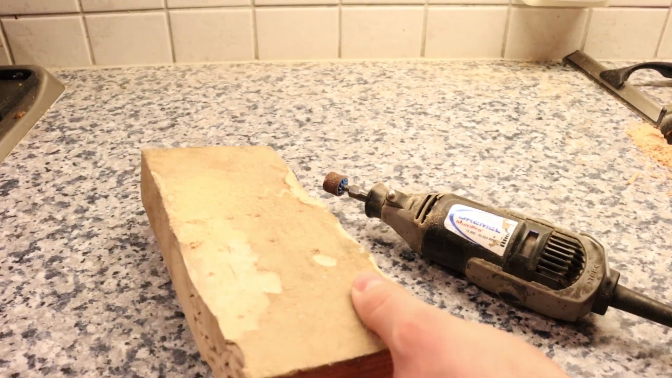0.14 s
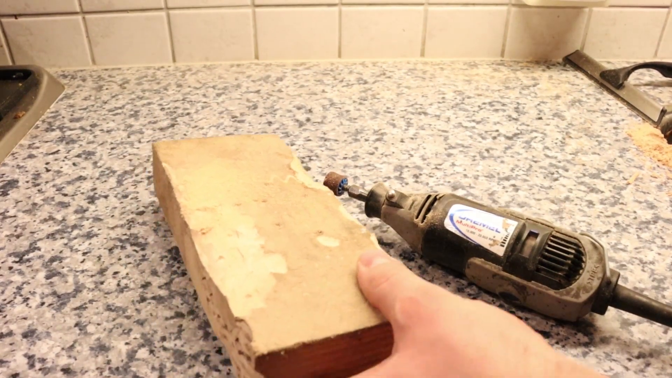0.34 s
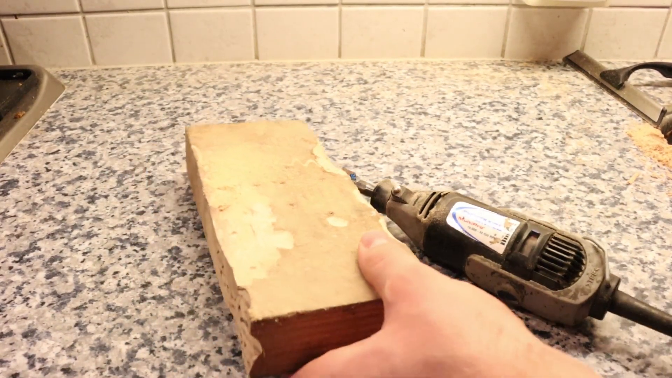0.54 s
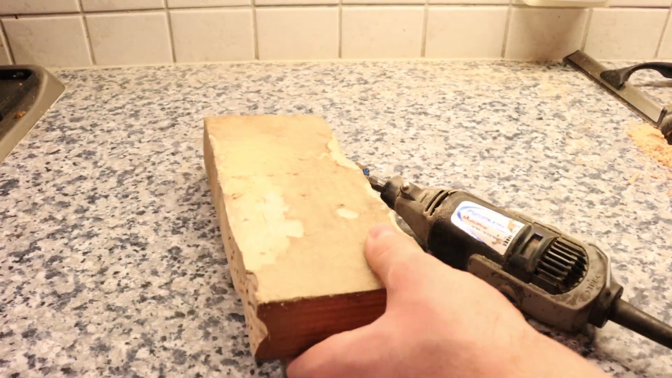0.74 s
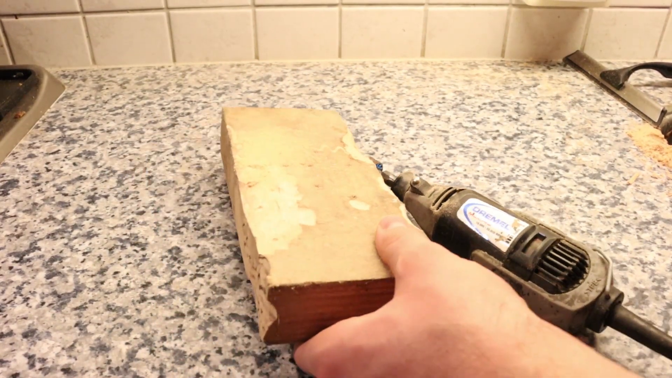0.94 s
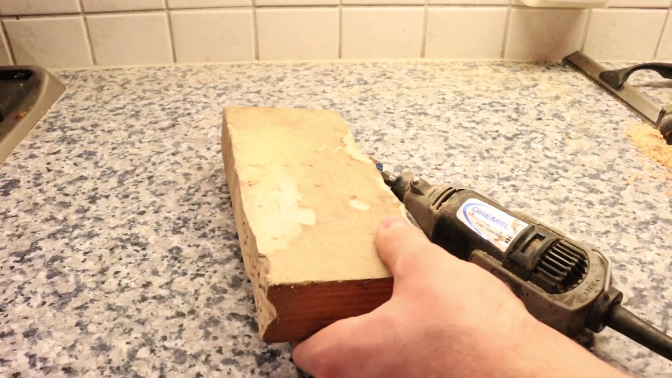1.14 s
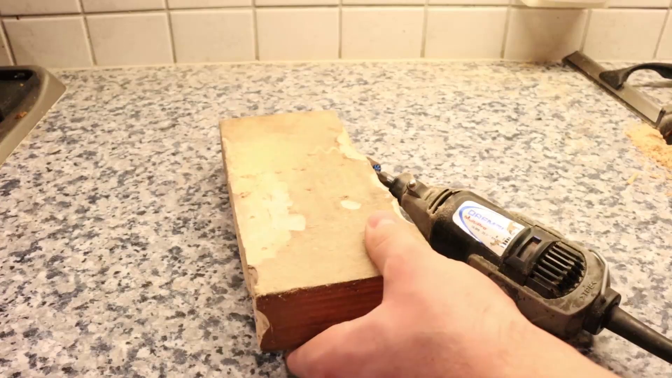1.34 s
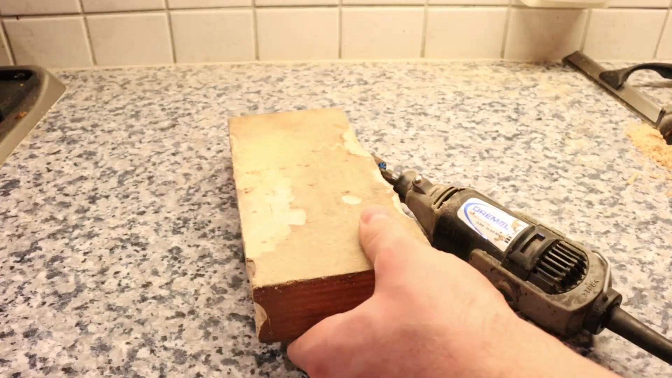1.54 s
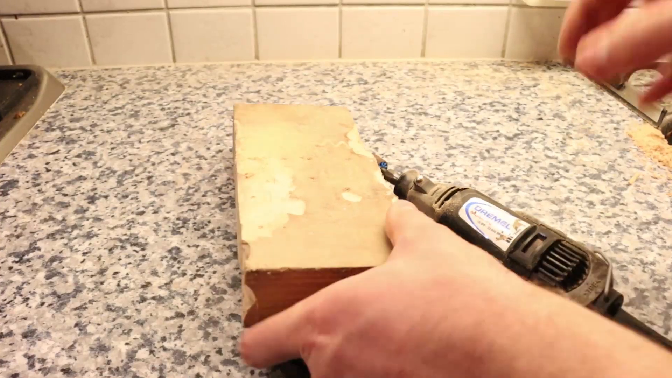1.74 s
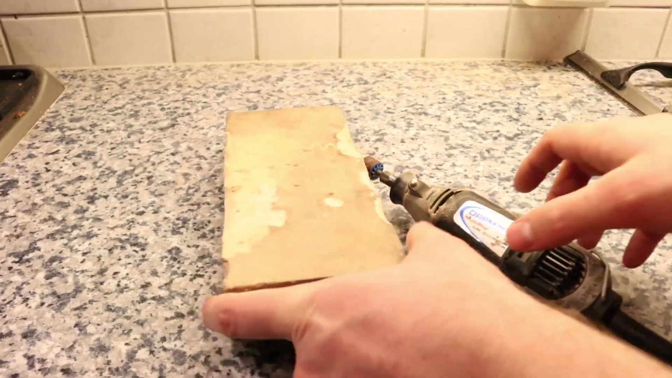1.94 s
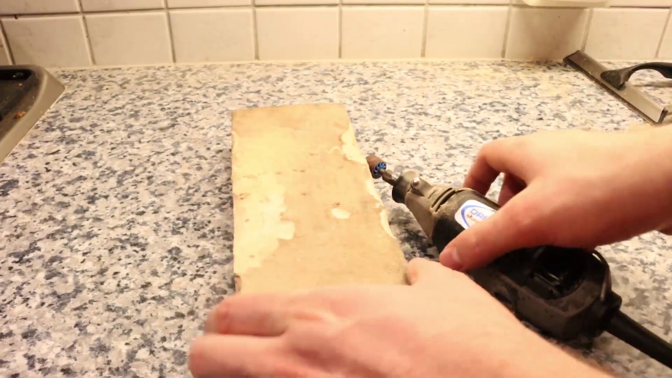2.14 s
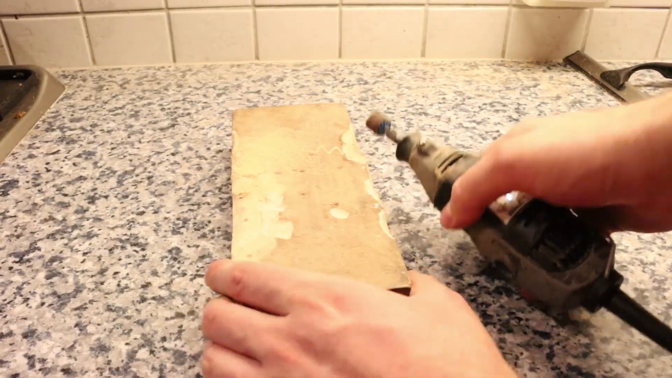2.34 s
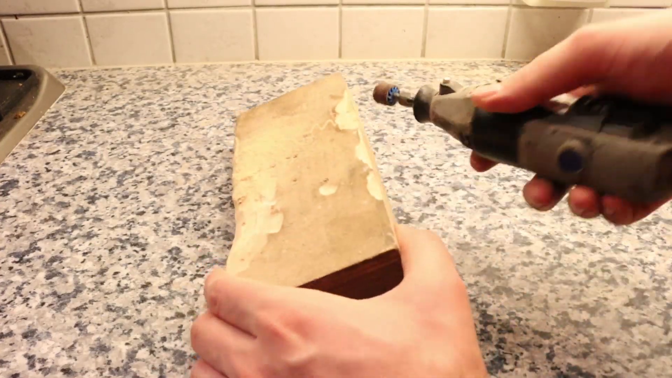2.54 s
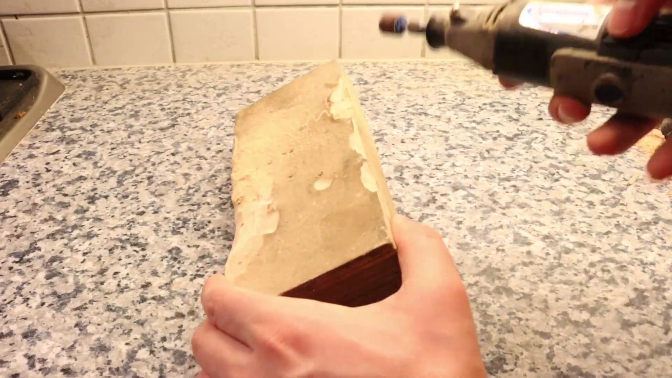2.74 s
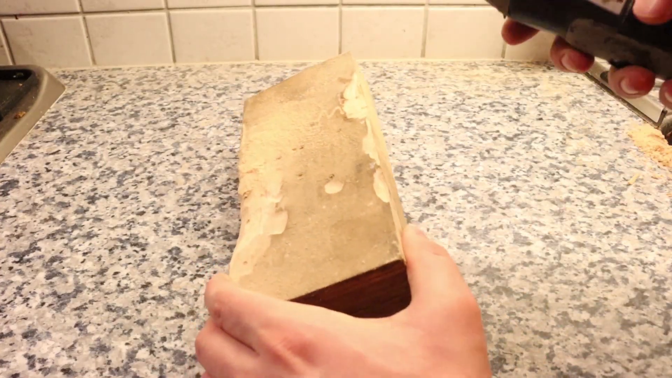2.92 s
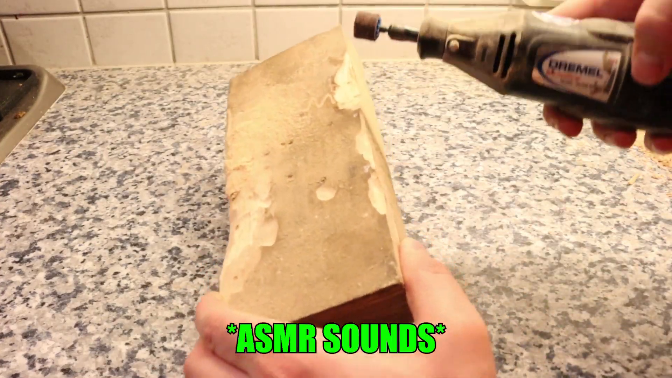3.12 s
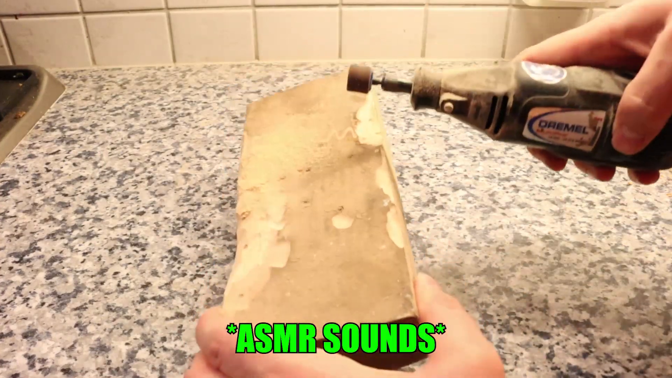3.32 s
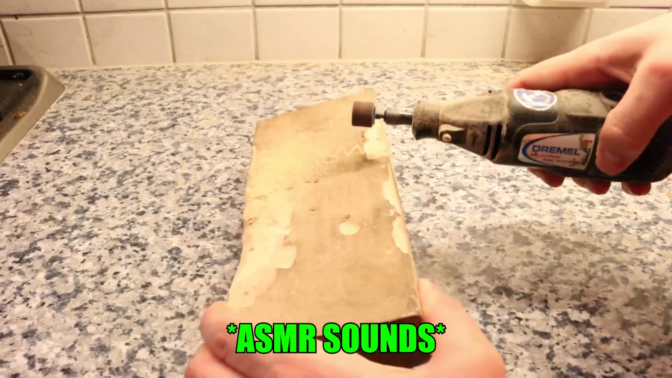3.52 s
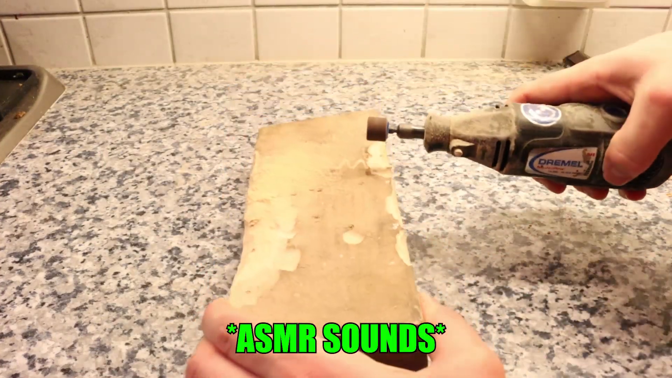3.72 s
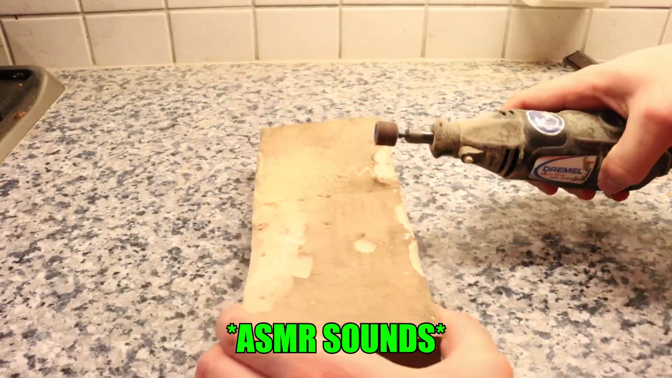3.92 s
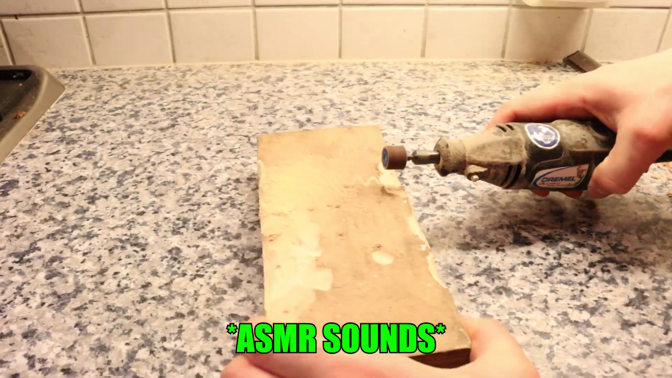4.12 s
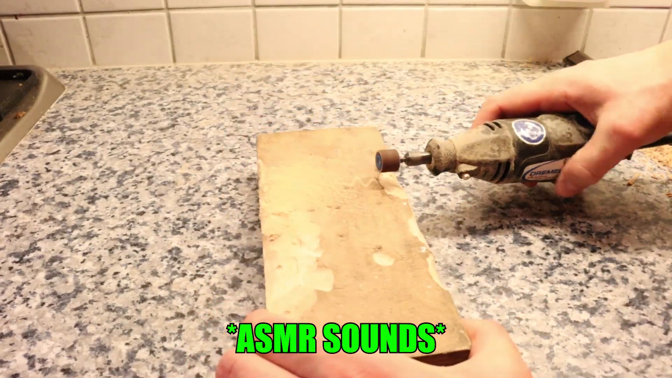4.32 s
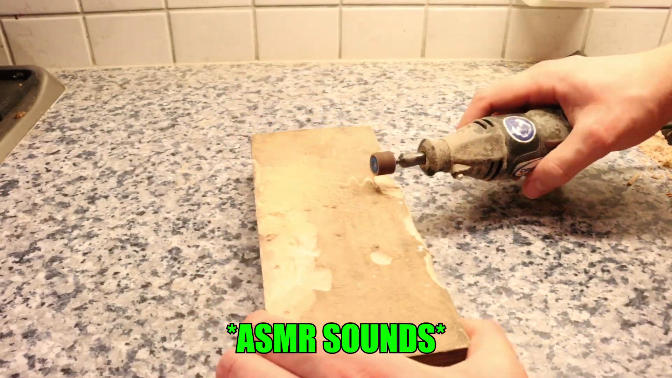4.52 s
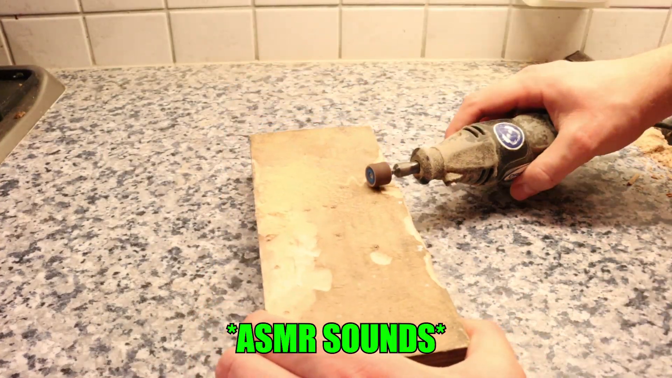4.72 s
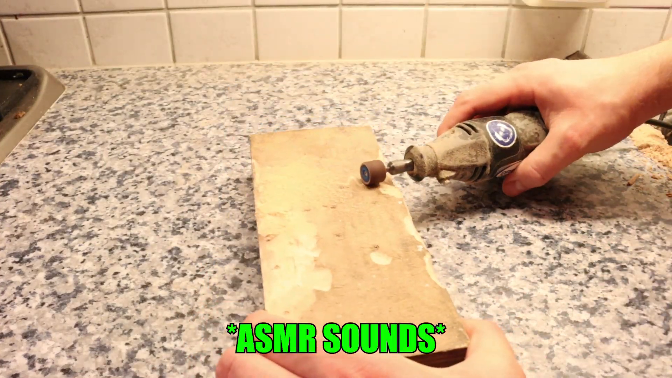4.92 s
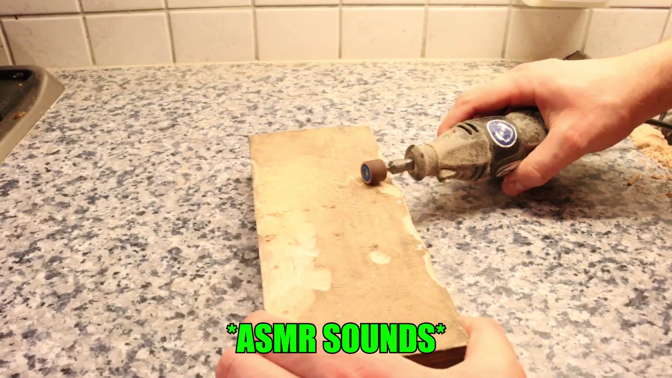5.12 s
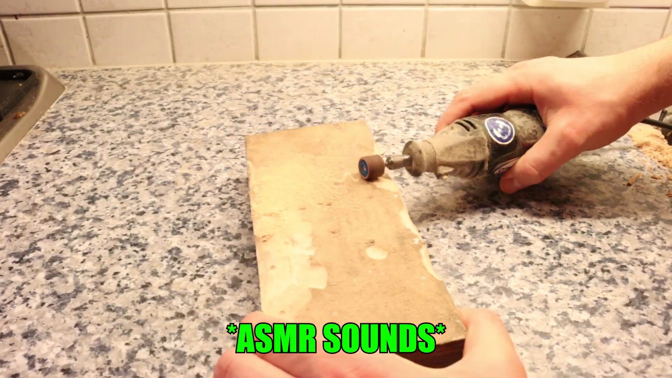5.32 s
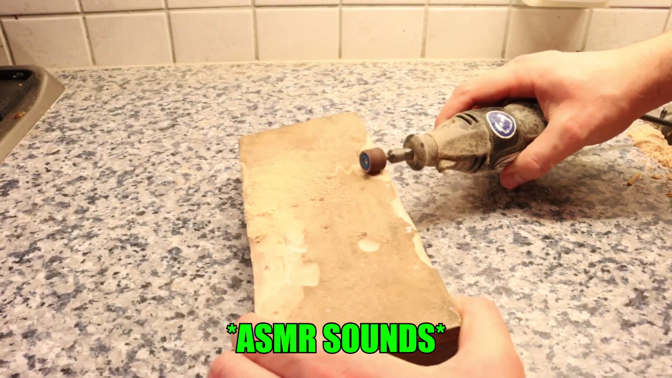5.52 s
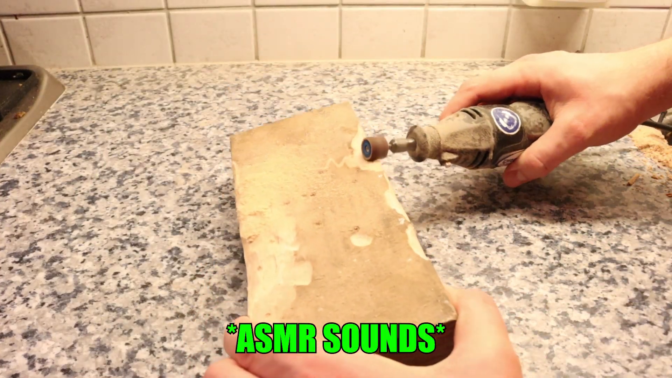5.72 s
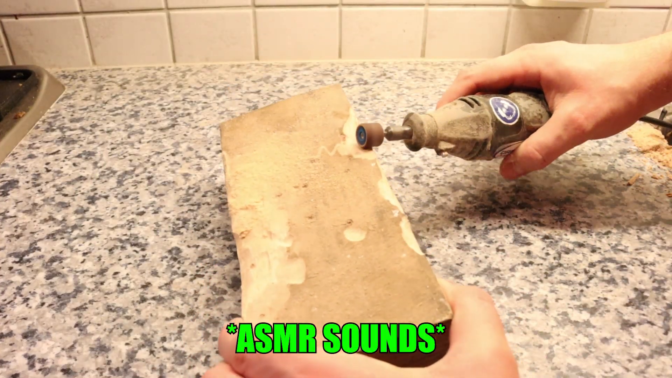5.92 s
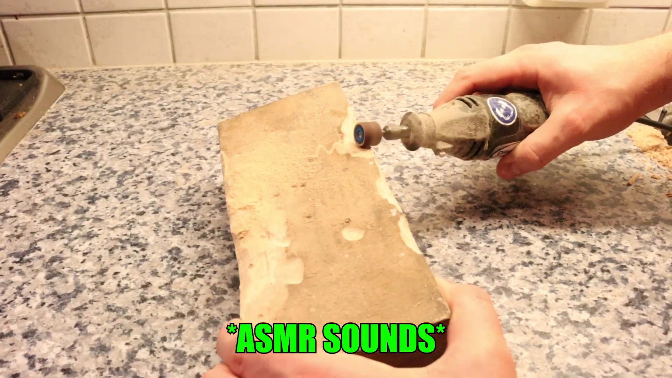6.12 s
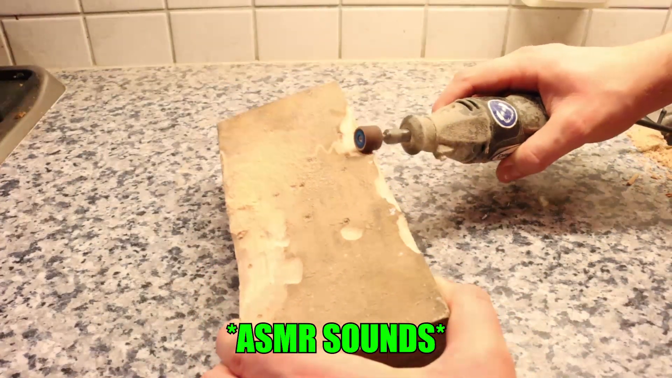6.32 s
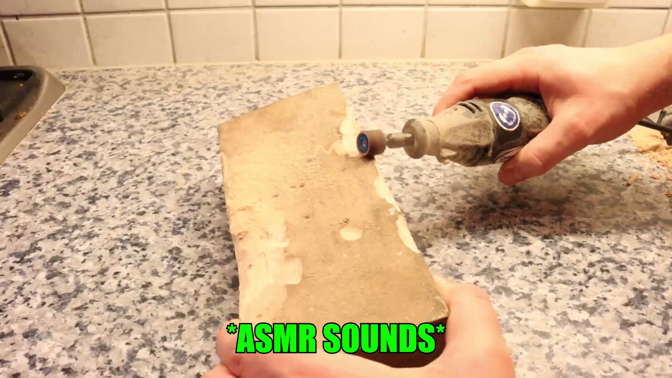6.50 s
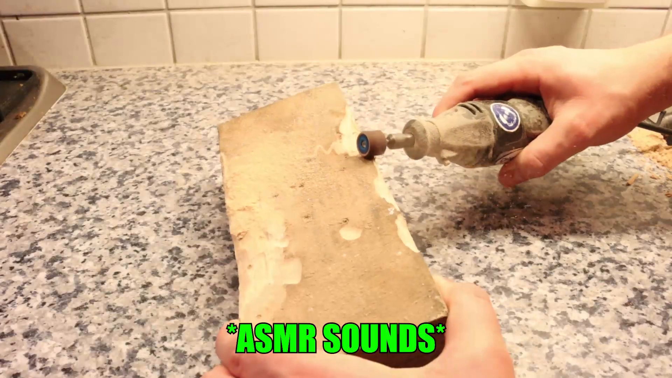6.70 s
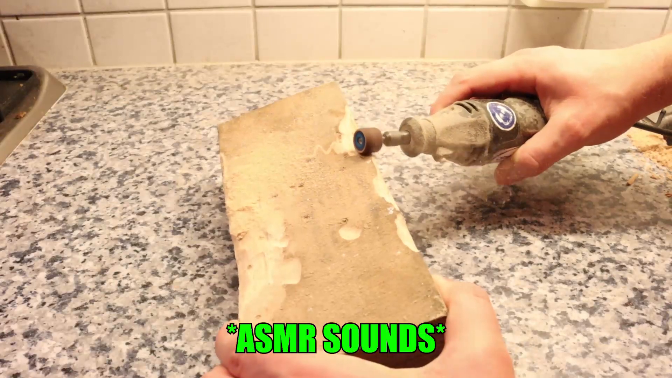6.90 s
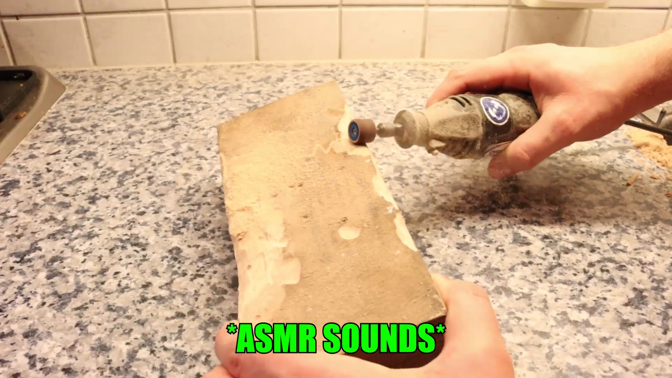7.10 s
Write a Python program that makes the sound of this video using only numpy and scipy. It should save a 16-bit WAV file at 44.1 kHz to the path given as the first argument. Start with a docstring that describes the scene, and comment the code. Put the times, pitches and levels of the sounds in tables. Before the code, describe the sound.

After wood slides and clatters on a countertop, a small handheld motor buzzes, winds up, and grinds the wood in two shrill passes.

```python
"""First a wooden block judders and scrapes over a stone kitchen counter, with knocks, scuffs and the zip
of a cord as a rotary tool is picked up. The tool switches on: bursts of chopped mains current buzz in
its housing while brushes hiss and the fan winds up. Its sanding drum then bites the block twice,
rasping, making the wood sing on multiples of the shaft speed (orders) and slowing under the load."""
import sys
import numpy as np
from scipy import signal
from scipy.fft import rfft, irfft, next_fast_len
from scipy.io import wavfile
from scipy.ndimage import uniform_filter1d

SR = 44100
rng = np.random.default_rng(int(sys.argv[2]) if len(sys.argv) > 2 else 0)


def unload_audio(sound):
    """Save the sound as a 16-bit wav file, at the path given as the first command line argument."""
    columns = np.transpose(np.atleast_2d(sound))
    # keep every value between -1 and 1, then stretch to whole-number steps
    steps = np.round(np.clip(columns, -1, 1) * 32767)
    wavfile.write(sys.argv[1], SR, steps.astype(np.int16))


N = 315756

# Tone colours. Each row: frequency in Hz, relative level in dB.
ROOM_SPECTRUM = [(20, -11), (38, -24), (48, 10.5), (60, -32), (100, 7.5), (200, -5), (500, -1.5),
                 (1500, -26.5), (15000, -56)]
JUDDER_SPECTRUM = [(41, -56), (70, -27), (149, -1.5), (306, -1), (387, -12.5), (449, 5), (527, -39),
                   (606, -9.5), (735, -38), (900, -15.5), (1170, -53), (1980, -120)]  # wood sticking and slipping on stone
SCRAPE_SPECTRUM = [(410, -40), (700, -4.5), (857, -5), (1220, -7), (1350, -5.5), (1570, -6.5), (1730, -6.5),
                   (2180, -6), (2360, -8.5), (3150, -7.5), (3740, -12), (4720, -11), (5090, -19.5),
                   (6000, -22), (7000, -35), (9100, -38), (15400, -120)]
RUB_SPECTRUM = [(2940, -38), (5000, -7.5), (5970, -5), (6840, -7.5), (10300, -10.5), (11600, -8),
                (15800, -14)]  # hiss on top of a slide
BLOW_SPECTRUM = [(35, -27), (60, -19), (302, 9), (750, -13), (1200, -12.5), (1710, -8.5), (1880, -11),
                 (2420, -17), (2650, -38), (3190, -19), (4840, -44), (15000, -40)]  # the push of a knock
RASP_SPECTRUM = [(600, -53), (2000, -12), (3500, 5), (5000, -2), (7000, -3.5), (9000, -6), (12000, -3.5),
                 (15000, -6), (15800, -16)]  # bright side of abraded wood
GRIND_SPECTRUM = [(150, -40), (250, -32), (500, -39), (800, 1.5), (1400, 2.5), (2300, 1.5), (3200, 8.5),
                  (5000, -39), (8000, -25)]  # its coarse midrange
FAN_SPECTRUM = [(100, -33.5), (250, -9.5), (500, -10), (800, -7), (1300, -5), (2300, 3.5), (4500, -4),
                (7000, -4.5), (10000, -9)]
BRUSH_SPECTRUM = [(2060, -13), (3500, 2), (3750, 1.5), (4310, -1), (4680, 0), (5310, -8), (7410, -38),
                  (7850, -6), (8620, -18), (9360, -1), (10200, -10), (13800, -3.5), (15800, -12.5)]
FLUTTER_SPECTRUM = [(90, -24), (150, -11), (200, -51), (255, -2.5), (330, 2.5), (450, -23.5)]  # low flutter of fan air brushing the microphone
WASH_SPECTRUM = [(500, -32), (950, -3), (1400, 0), (2400, 0.5), (4000, -11.5)]  # midrange rush of air
GRIT_SPECTRUM = [(380, -53), (650, -19), (1370, -9.5), (1770, -46), (2100, -12), (2710, -15), (3270, -9.5),
                 (3690, -24), (4100, -7.5), (4630, -24), (5800, -16.5), (7280, -14.5), (9020, -19.5),
                 (15800, -12.5)]  # shapes the drum's comb of tones
FIZZ_SPECTRUM = [(7000, -25), (11000, -5), (13500, -2), (15500, -1), (15900, -6)]  # drum on the block's corner

# The shaft winds up, then sags under each pass. Each row: time in seconds, turns per second.
SHAFT_SPEED = [(3.42, 20.2), (3.5, 75), (3.62, 121), (3.72, 153), (3.85, 188), (4.0, 223), (4.2, 270),
               (4.4, 309), (4.6, 348), (4.8, 381), (5.0, 382), (5.12, 380), (5.33, 378), (5.45, 372),
               (5.58, 360), (5.79, 379.5), (5.9, 383), (6.1, 375.4), (6.27, 365), (6.43, 367), (6.6, 352),
               (6.8, 344), (7.16, 326)]
# Level rides. Each row: time in seconds, relative level in dB.
ROOM_RIDE = [(0, -63), (2.3, -62.5), (3.4, -75), (4.3, -82.5), (7.16, -101)]
CURRENT_RIDE = [(3.42, -15.5), (3.52, -6.5), (3.66, -3), (3.76, -4), (3.92, -2.5), (4.12, 2), (4.3, -4),
                (4.45, -5.5), (7.16, -22)]  # high while the motor accelerates
WHINE_RIDE = [(3.4, -77), (4.1, -72), (4.6, -51), (5.9, -53), (6.4, -66), (7.16, -61)]
IMBALANCE_RIDE = [(4.25, -64), (4.45, -60.5), (4.6, -57.5), (4.85, -53), (5.36, -52), (5.51, -45),
                  (5.68, -62), (6.55, -52), (6.82, -64.5), (7.0, -60.5), (7.16, -58.5)]
PRESSURE_RIDE = [(4.85, -6.5), (5.1, 0), (5.3, -2), (5.5, -1), (5.78, 0), (5.9, 0), (6.33, -2), (6.55, 2.5),
                 (6.85, -4.5), (7.16, -2.5)]  # the hand's push on the drum
FIZZ_RIDE = [(5.6, -13), (5.79, 3), (6.0, -1), (6.25, 8), (6.6, -4), (6.85, 3), (7.16, 0)]  # rises over the rasp as the drum meets the corner

# Resonances. Each row: centre in Hz, width in Hz, relative level in dB.
HOLLOW_MODES = [(176, 76, -7.5), (231, 38, 5.5), (308, 37, 0), (433, 40, -11.5)]  # block resting on the counter
SCRAPED_MODES = [(1393, 40, -8), (1724, 50, 1.5), (1850, 64, -4.5), (2360, 460, -15), (2850, 87, -5),
                 (3190, 69, -5), (4200, 200, -9)]  # scraped wood
THUMP_MODES = [(146.4, 6.8, 6), (326, 71, -1.5), (588, 63, -1.5), (836, 120, -9.5), (1310, 260, -14.5)]  # low body of a knock
HOUSING_MODES = [(2472, 194, -3.5), (3060, 1100, -20.5), (4500, 340, -27), (6030, 1800, -31)]
DUCT_MODES = [(809.4, 35, 6), (1084, 140, -1), (1330, 42, 2.5), (1730, 220, -7)]  # the housing's air channels
SINGING_MODES = [(1740, 42, -34), (1890, 76, -47), (2048, 54, -42), (2190, 96, -54.5), (2710, 280, -52),
                 (2850, 78, -52), (3100, 130, -50), (3120, 78, -41), (3810, 230, -54.5)]  # block under the drum

# Motor tones. Each row: shaft order, relative level in dB.
COMMUTATOR_ORDERS = [(8, 6.5), (16, -0.5), (24, -6.5), (32, -6.5)]  # segments passing the brushes
CHIRP_ORDERS = [(16, -9.5), (18, -14), (24, -8), (32, -7.5), (36, -14)]  # brushes chirping on the segments
WHINE_ORDERS = [(18, -6.5), (24, -22), (36, -32)]  # fan blades and vents
# Stator hum. Each row: multiple of the burst rate, relative level in dB.
STATOR_HARMONICS = [(2, -72), (4, -64.5)]

# Pushes over the counter. Each row: start and end in seconds, judder, scrape and hiss levels in dB,
# wood resonance in dB over the scrape.
SLIDES = [(0.007, 0.19, -52.5, -54.5, -65.5, 1.5), (0.21, 0.385, -44, -53, -55.5, -0.5),
          (0.445, 0.686, -42.5, -47, -52, 4.5), (0.838, 0.944, -45, -54, -57, -5),
          (1.595, 1.76, -55, -55.5, -58, -7), (1.831, 1.898, -48, -40, -52, 9),
          (2.11, 2.138, -54, -45.5, -58.5, -10), (2.323, 2.363, -49, -50, -59.5, -4),
          (2.546, 2.747, -55.5, -57.5, -58.5, -5), (2.855, 3.104, -72, -73, -60.5, -11)]
# Blows on the counter. Each row: start in seconds, then relative thud, knock and click levels in dB.
KNOCKS = [(0.181, -45.5, -62, -72), (0.236, -43, -53, -64), (0.468, -41, -67, -58), (0.535, -44, -60, -60),
          (0.573, -36, -45, -51), (0.648, -49, -70, -68), (0.886, -48.5, -59, -60), (1.461, -68, -58, -62),
          (1.97, -18, -19, -22.5), (2.019, -22.5, -22, -32.5), (2.043, -31, -31.5, -40),
          (2.092, -31.5, -49, -73), (2.145, -19, -59, -36.5), (2.153, -18.5, -22.5, -47),
          (2.479, -27, -44, -58), (2.54, -35.5, -59, -56.5), (2.579, -42, -68, -70),
          (2.931, -40.5, -44.5, -52), (2.95, -42.5, -48.5, -64), (3.143, -63.5, -67, -75),
          (3.167, -51.5, -58.5, -68), (3.322, -52.5, -50, -47.5), (3.331, -50.5, -54, -55),
          (3.349, -52.5, -56, -67), (3.395, -61.5, -69, -59), (3.754, -33.5, -47.5, -61),
          (3.776, -44, -63, -69), (4.291, -56.5, -84, -79)]
# The slab's ring. Each row: frequency in Hz, relative level in dB.
COUNTER_MODES = [(104, -36.5), (149, -29.5), (222, -33), (272, -32.5), (318, -26.5), (347, -26.5),
                 (409.1, -34.5), (500.6, -39.5), (581.4, -71), (619.1, -33), (690, -41), (861.3, -40.5),
                 (947.5, -42), (985.1, -42), (1050, -47), (1098, -49.5), (1147, -55), (1276, -47),
                 (1400, -46), (1750, -37), (1885, -45), (1981, -61), (2143, -61), (2638, -57), (2891, -76),
                 (3160, -73), (3295, -79)]
# Its decay after a hard blow. Each row: frequency in Hz, seconds to fall 60 dB.
COUNTER_DECAY = [(150, 0.39), (350, 0.24), (600, 0.24), (950, 0.36), (1800, 0.14), (3200, .11)]
# Catches of the wood. Each row: peak time in seconds, rise in seconds, relative level in dB.
SCUFFS = [(0.189, .004, -46), (0.704, 0.017, -40.5), (2.382, 0.0099, -51), (2.886, 0.008, -57),
          (3.235, 0.042, -57.5), (4.861, 0.009, -36.5), (5.774, 0.0018, -40.5)]
# Pulls on the cord. Each row: start and length in seconds, top pitch in Hz, relative level in dB.
CORD_PULLS = [(1.512, 0.42, 5030, -57), (2.048, 0.33, 5140, -60)]
# Its squeaks. Each row: start and length in seconds, pitch at the ends and at the top in Hz, level in dB.
CORD_SQUEAKS = [(1.53, .17, 10800, 12700, -73), (1.57, 0.25, 9700, 10300, -67),
                (1.6, 0.12, 13300, 13900, -72), (1.673, .17, 11300, 12100, -62),
                (2.08, .2, 13900, 14650, -67), (2.136, 0.17, 11100, 12550, -69)]
# Drum on wood. Each row: start and end in seconds, then relative rasp, grind and singing levels in dB.
PASSES = [(4.846, 5.507, -45.5, -54, 3.5), (5.821, 7.2, -49, -57, -2)]
# Grabs of the drum. Each row: peak time and length in seconds, shaft order, level in dB.
SQUEALS = [(4.868, 0.023, 7, -41.5), (4.866, .025, 8, -48), (4.869, 0.018, 11, -52), (4.945, .06, 8, -48),
           (5.078, 0.097, 8, -38), (5.095, 0.037, 5, -46), (5.118, .13, 13, -49), (5.123, 0.075, 10, -48),
           (5.16, 0.14, 6, -37.5), (5.172, .17, 11, -42.5), (5.175, 0.15, 7, -37.5), (5.197, 0.11, 16, -49),
           (5.352, 0.13, 5, -33.5), (5.41, 0.086, 6, -46), (5.425, 0.25, 8, -39.5), (5.43, 0.062, 7, -36.5),
           (5.395, .08, 11, -44), (5.478, 0.068, 11, -34), (5.483, 0.14, 9, -39.5),
           (5.494, 0.19, 10, -43.5), (5.504, 0.14, 12, -45.5), (5.524, 0.052, 13, -45),
           (5.534, 0.045, 5, -40.5), (5.541, 0.03, 9, -27), (5.826, 0.026, 8, -35.5),
           (5.876, 0.075, 8, -43), (5.894, 0.073, 7, -43), (6.003, .09, 8, -44), (6.013, 0.017, 8, -33),
           (6.015, 0.022, 7, -42.5), (6.084, 0.1, 5, -43), (6.148, 0.055, 7, -42.5),
           (6.153, 0.021, 11, -38), (6.17, 0.12, 8, -39), (6.246, .14, 5, -35.5), (6.28, 0.17, 11, -41),
           (6.389, 0.041, 5, -32.5), (6.442, 0.054, 8, -41.5), (6.467, 0.056, 11, -36.5),
           (6.47, 0.046, 9, -37), (6.523, 0.14, 13, -44.5), (6.526, 0.12, 5, -40), (6.574, 0.051, 9, -31.5),
           (6.666, 0.096, 5, -29), (6.699, 0.15, 9, -41), (6.8, .11, 5, -31), (6.796, 0.077, 8, -46),
           (6.926, 0.09, 8, -45), (6.93, 0.075, 12, -42.5), (6.987, 0.17, 6, -46), (7, .08, 5, -41),
           (7.042, 0.19, 9, -37.5)]

# Stereo width of noise. Each row: frequency in Hz, left-right correlation.
STEREO_LIKENESS = [(150, 0.97), (380, 0.75), (950, 0.57), (2380, 0.19), (5980, 0.032), (15000, 0.055)]
# Placement. Each row: frequency in Hz, left minus right in dB.
HAND_PAN = [(60, -1.5), (150, -0.5), (380, -1.5), (600, 2.5), (950, 1), (2380, -2), (5980, -1.5),
            (15000, -3.0)]
TOOL_PAN = [(120, -5), (240, 0), (480, 5), (950, 5.5), (1890, -4.5), (3770, -1.5), (7520, -0.5),
            (15000, -4.5)]
# Reverb of the tiled walls. Each row: frequency in Hz, seconds to fall 60 dB.
KITCHEN_DECAY = [(120, 0.079), (400, 0.39), (1000, 0.11), (2500, 0.18), (10000, 0.027)]

SWITCH_ON_S, BUZZ_END_S = 3.41, 4.31  # the buzz dies away as the set speed nears
FULL_SPEED_HZ, BURST_HZ = 380, 100  # shaft turns; half waves of the mains
TIME = np.arange(N) / SR


def amp(db):
    """Decibels to gain."""
    return 10 ** (np.asarray(db) / 20)


def unit(x):
    """Scale to rms 1."""
    return x / np.sqrt(np.mean(x ** 2) + 1e-20)


def along(points, hz):
    """Read (Hz, value) points on a log frequency axis."""
    freqs, values = np.transpose(points)
    return np.interp(np.log(hz + 1), np.log(freqs + 1), values)


def ride(points):
    """Turn (seconds, value) points into one value per sample."""
    return np.interp(TIME, *np.transpose(points))


def during(start, end=99, attack=0.19, release=0.092):
    """A gate that fades in before start and out after end, all in seconds."""
    return np.clip(np.minimum(1 + (TIME - start) / attack, 1 - (TIME - end) / release), 0, 1)


def wobble(rate):
    """A smooth random curve, rate knots a second."""
    knots = rng.standard_normal(int(N * rate / SR) + 4)
    smooth = signal.resample(knots, len(knots) * 8)
    return np.interp(TIME * rate * 8, np.arange(len(smooth)), smooth)


def filtered(x, response):
    """Filter x by a complex response, given as a function of Hz."""
    n = x.shape[-1]
    padded = next_fast_len(n + 8192)
    return irfft(rfft(x, padded) * response(np.fft.rfftfreq(padded, 1 / SR)), padded)[..., :n]


def resonate(x, modes):
    """Play x through parallel resonances of alternating polarity."""
    return filtered(x, lambda f: sum(
        (-1) ** k * amp(db) * 1j * f * width / (centre ** 2 - f ** 2 + 1j * f * width)
        for k, (centre, width, db) in enumerate(modes)))


def pan(left_db):
    """Left and right gains for a level difference."""
    return amp(np.array([[.5], [-.5]]) * left_db)


def noise(spectrum):
    """Coloured stereo noise of rms 1, near mono in the bass and wide in the treble."""
    def colour(hz):
        spread = np.arccos(along(STEREO_LIKENESS, hz)) / 2
        return amp(along(spectrum, hz)) * [np.cos(spread), np.sin(spread)]
    mid, side = filtered(rng.standard_normal((2, N)), colour)
    return unit(np.array([mid + side, mid - side]))


def wavering(angle, orders, flicker_db, flicker_rate, jitter_rad, jitter_rate):
    """Sines on multiples of a turning angle, each unsteady in level and phase."""
    return sum(amp(db + flicker_db * wobble(flicker_rate))
               * np.sin(order * angle + jitter_rad * wobble(jitter_rate)) for order, db in orders)


def kitchen(x, wet_db):
    """Mono x with a fresh stereo tail from the tiled walls."""
    hz, t, spectra = signal.stft(rng.standard_normal((2, SR // 2)), SR, nperseg=256)
    tail = signal.istft(spectra * amp(-60 * t / along(KITCHEN_DECAY, hz)[:, None]), SR, nperseg=256)[1]
    tail /= np.linalg.norm(tail[0])
    return x + amp(wet_db) * signal.fftconvolve(x[None], tail, axes=1)[:, :len(x)]


def add(track, start_s, sound):
    """Mix a stereo sound into the track."""
    part = track[:, round(start_s * SR):][:, :sound.shape[-1]]
    part += sound[..., :part.shape[-1]]


def room_tone():
    """A low mono rumble that fades away under the scene."""
    return amp(ride(ROOM_RIDE) + 9) * noise(ROOM_SPECTRUM).mean(axis=0)


def slides():
    """Wood judders, scrapes and hisses over the stone; more weight brings out its resonances."""
    gates = np.array([during(start, end, attack=0.11, release=0.14) for start, end, *_ in SLIDES])
    _, _, judder_db, scrape_db, hiss_db, ring_db = np.transpose(SLIDES)
    grip = during(0, 3.08, release=0.56)  # the hand shifting between pushes

    def level(push_db, grip_db):
        return np.sqrt(amp(push_db) ** 2 @ gates ** 2 + (amp(grip_db) * grip) ** 2)
    stick_slip = amp(1.2 * wobble(44.96)) * noise(JUDDER_SPECTRUM)
    judder = unit(amp(-2) * unit(stick_slip) + unit(resonate(stick_slip, HOLLOW_MODES)))
    grains = unit(amp(0.92 * wobble(700)))
    friction = grains * amp(1.72 * wobble(34.95))
    weight = amp(ring_db) @ gates / np.maximum(gates.sum(axis=0), 1)
    ringing = weight * unit(resonate(friction * noise(SCRAPE_SPECTRUM), SCRAPED_MODES))
    scrape = (friction * noise(SCRAPE_SPECTRUM) + ringing) / np.sqrt(1 + weight ** 2)
    hiss = grains * noise(RUB_SPECTRUM)
    return (level(judder_db, grip_db=-62.5) * judder + level(scrape_db, grip_db=-59.5) * scrape
            + level(hiss_db, grip_db=-64.5) * hiss)


def counter_ring(t, damping):
    """The struck slab's modes ring down, scaled to peak 1."""
    ring = sum(amp(db + rng.normal(0, 0.49) - 60 * damping * t / along(COUNTER_DECAY, hz))
               * np.sin(2 * np.pi * hz * t + rng.uniform(0, 2 * np.pi)) for hz, db in COUNTER_MODES)
    ring *= 1 - np.exp(-t / 0.00016)
    return ring / np.abs(ring).max()


def knocks():
    """Each blow is a short push that rings the counter; harder contacts carry more knock and click."""
    out, t = np.zeros((2, N)), np.arange(SR // 2) / SR
    bands = [signal.butter(order, edges_hz, "band", fs=SR, output="sos")  # thud, knock, click
             for order, edges_hz in [(2, (100, 500)), (4, (500, 1400)), (2, (1400, 7000))]]
    wet_dbs = (-9, -6.5, -8)
    cushion_s, heave_s, slap_s = 0.0012, 0.0048, 0.00022
    loudest_click_db = max(row[3] for row in KNOCKS)
    # Minimum phase packs the push's energy at its start.
    cepstrum = irfft(np.log(amp(along(BLOW_SPECTRUM, np.fft.rfftfreq(len(t), 1 / SR)))))
    push = irfft(np.exp(rfft(2 * cepstrum * (t > 0) * (t < t[-1] / 2))))
    push /= np.abs(push).max()
    thump = resonate(1.0 * (t == 0), THUMP_MODES)
    thump *= amp(-8.5) / np.abs(thump).max()
    for start, thud_db, knock_db, click_db in KNOCKS:
        soft = knock_db < thud_db - 3  # the hand-held block thuds, the tool clatters
        ring_db = -9 + 0.24 * min(knock_db - thud_db, 0)
        blow = push + amp(ring_db) * counter_ring(t, damping=1.45 if soft else 1) + thump
        blow *= 1 - soft * np.exp(-t / cushion_s)
        parts = [signal.sosfilt(band, blow) for band in bands]
        levels = [thud_db + 0.5, knock_db - 0.4, click_db - 1.5]
        hit = sum(kitchen(amp(db) * part / np.std(part[t < .025]), wet_db)
                  for db, wet_db, part in zip(levels, wet_dbs, parts))
        heave = amp(click_db - 1) * (1 - t / heave_s) * np.exp(-t / heave_s)  # the whole slab moves
        swing = t / slap_s - 4  # a hard contact opens with one sharp swing of pressure
        slap = (not soft) * amp(knock_db + 11.5) * swing * np.exp(.5 - .5 * swing ** 2)
        top_hz = max(12000 * amp(0.99 * (click_db - loudest_click_db)), 3500)  # softer is duller
        left, right = signal.sosfilt(signal.butter(2, top_hz, fs=SR, output="sos"), hit + heave + slap)
        side = filtered((left - right) / 2, lambda hz: hz ** 2 / (hz ** 2 + 380 ** 2))  # centred bass
        add(out, start, (left + right) / 2 + np.array([side, -side]))
    return out


def scuffs():
    """A brief bright rasp where the wood catches."""
    decay_s = 0.0097
    swell = sum(amp(db) * during(peak, attack=rise) * np.exp(-np.maximum(TIME - peak, 0) / decay_s)
                for peak, rise, db in SCUFFS)
    return swell * (noise(RASP_SPECTRUM) + amp(0.5) * noise(GRIND_SPECTRUM))


def cord():
    """The cord zips along behind the tool, higher and louder mid-pull, with thin squeaks on top."""
    def arch(start, length):
        return np.abs(np.sin(np.pi * np.clip((TIME - start) / length, 0, 1)))

    def tone(hz):
        return np.sin(2 * np.pi * np.cumsum(hz) / SR)
    slow_hz = 4210
    zip_hz, zip_gain, squeaks = slow_hz, 0, 0
    for start, length, top_hz, db in CORD_PULLS:
        pace = arch(start, length)
        zip_hz += (top_hz - slow_hz) * pace
        zip_gain += amp(db) * np.sqrt(pace)
    for start, length, end_hz, top_hz, db in CORD_SQUEAKS:
        pace = arch(start, length)
        pitch = (end_hz + (top_hz - end_hz) * pace) * (1 + .004 * wobble(30) + .012 * wobble(1500))
        squeaks += amp(db + 2 * wobble(29.1)) * np.sqrt(pace) * tone(pitch)
    zipping = amp(-3) * zip_gain * tone(zip_hz * (1 + .09 * wobble(2500)))
    return kitchen(zipping, wet_db=7.5) + kitchen(squeaks, wet_db=0)


def current_bursts(speed):
    """The speed control passes one burst per half wave of the mains, longer as the speed rises."""
    half_wave = (TIME * BURST_HZ + .5) % 1 - .5
    width = np.hypot(0.073, 0.13 * (speed / FULL_SPEED_HZ) ** 5)  # in half waves
    bursts = np.exp(-.5 * ((half_wave + .04) / width) ** 2) * amp(.4 * wobble(100))
    return (bursts + 0.088) / np.sqrt(width)  # a little current flows between bursts


def commutator_buzz(angle, bursts, current_db):
    """Bursts chop the segment tones and sparks; the buzz swells as an order crosses a housing mode."""
    segments = sum(amp(db) * np.sin(order * angle + 0.099 * wobble(200))
                   for order, db in COMMUTATOR_ORDERS)
    sparks = 0.59 * rng.standard_normal(N)
    gate = during(SWITCH_ON_S, BUZZ_END_S, release=0.36)
    buzz = unit(gate * resonate(bursts * (segments + sparks), HOUSING_MODES))
    buzz *= np.sqrt(np.mean(gate ** 2)) * amp(-39.5 + 0.8 * current_db)
    return kitchen(buzz, wet_db=-4) * pan(-6)


def stator_hum(current_db):
    """The stator hums on multiples of the burst rate during the wind-up."""
    phase = 2 * np.pi * BURST_HZ * TIME
    hum = wavering(phase, STATOR_HARMONICS, flicker_db=1.1, flicker_rate=22, jitter_rad=.5, jitter_rate=30)
    return hum * amp(.5 * current_db) * during(SWITCH_ON_S, BUZZ_END_S)


def fan_air(speed, current_db):
    """Ducted noise: the fan's air follows the speed, the housing's rattle follows the current."""
    air_db = -46 + 63 * np.log10(speed / FULL_SPEED_HZ)
    rattle_db = -42.5 + 1.12 * current_db
    rush = unit(noise(FAN_SPECTRUM) + amp(-10) * unit(resonate(noise(FAN_SPECTRUM), DUCT_MODES)))
    return np.hypot(amp(air_db), amp(rattle_db)) * rush * amp(0.17 * wobble(25))


def brush_hiss(current_db):
    """The brushes' grainy hiss follows the current and drops back near full speed."""
    hiss = amp(-46 + current_db) * noise(BRUSH_SPECTRUM) * unit(amp(1.5 * wobble(900)))
    return hiss * np.maximum(during(0, 4.17, release=.16), 0.22)


def brush_chirps(angle, bursts, current_db):
    """Brushes chirp on the segments, muffled by the housing and pulsing with the current bursts."""
    muffle_hz, pulse_share = 6970, .55
    chirps = wavering(angle, CHIRP_ORDERS, flicker_db=3, flicker_rate=55, jitter_rad=.6, jitter_rate=240)
    chirps = filtered(chirps, lambda hz: 1 / (1 + (hz / muffle_hz) ** 6))
    pulse = 1 - pulse_share + pulse_share * unit(bursts)
    return chirps * pulse * amp(-49 + current_db) * during(SWITCH_ON_S, BUZZ_END_S)


def motor(angle, speed):
    """The running tool: buzz, air and brushes, the fan blades' whine and the unbalanced rotor's hum."""
    current_db, bursts = ride(CURRENT_RIDE), current_bursts(speed)
    hiss = fan_air(speed, current_db) + brush_hiss(current_db)
    whine = wavering(angle, WHINE_ORDERS, flicker_db=1.2, flicker_rate=28, jitter_rad=.6, jitter_rate=110)
    tones = kitchen(brush_chirps(angle, bursts, current_db) + whine * amp(ride(WHINE_RIDE)), wet_db=6)
    whirr = during(SWITCH_ON_S) * (hiss + tones) * pan(-2.8)
    imbalance = amp(ride(IMBALANCE_RIDE) + 3.5 + 2.5 * wobble(22)) * during(IMBALANCE_RIDE[0][0])
    rotor_hum = imbalance * np.sin(angle + 0.098 * wobble(45))
    return commutator_buzz(angle, bursts, current_db) + stator_hum(current_db) + whirr + rotor_hum


def draught():
    """The fan's draught flutters on the microphone, with a midrange rush of air."""
    flutter = amp(-55 + 3.1 * wobble(15)) * noise(FLUTTER_SPECTRUM)
    wash = amp(-45 + wobble(15)) * noise(WASH_SPECTRUM)
    return (flutter * during(4.93, 5.07, attack=0.18, release=0.28)
            + wash * during(4.74, 5.42, attack=.4, release=0.062))


def grit_comb(angle, speed):
    """The same grit passes the wood once a turn: a comb of tones that drift as the contact changes."""
    comb, scatter_rad = np.zeros((2, N)), 0.011 * wobble(700)
    for order in range(2, 49):
        phase = order * (angle + scatter_rad) + 1.46 * wobble(12)
        spread = min(order / 22, 1) * wobble(7)  # each side has its own mix of reflections
        colour_db = along(GRIT_SPECTRUM, order * speed[::64]).repeat(64)[:N]
        strength = amp(colour_db + 3.6 * wobble(14) + 1.5 * wobble(60))
        comb += strength * np.sin([phase + spread, phase - spread])
    return comb / np.std(filtered(comb, lambda hz: hz > 7500))  # treble at rms 1


def singing_block(angle, speed, drive):
    """Each shaft order rings the block as it nears a mode, and squeals out where the drum grabs."""
    out = np.zeros((2, N))
    for order in range(4, 17):
        on_mode = np.sqrt(sum(amp(db) ** 2 / (1 + (2 * (order * speed - hz) / width) ** 2)
                              for hz, width, db in SINGING_MODES))
        grab = sum(amp(db) * np.exp(-(1.7 * (TIME - peak) / length) ** 2)
                   for peak, length, squeal_order, db in SQUEALS if squeal_order == order)
        chatter_db = 1.9 * np.tanh(3 * wobble(65))  # flips between grip and slip
        drift_db, grain_db = 1.4 * wobble(15), wobble(170)
        strength = np.hypot(drive * on_mode, grab) * amp(drift_db + chatter_db + grain_db)
        phase, spread = order * angle + 0.14 * wobble(70), 0.73 * wobble(6)
        out += strength * np.sin([phase + spread, phase - spread])
    return out


def sanding(angle, speed):
    """The drum rasps, grinds and sets the block singing, louder as the hand presses harder."""
    bite_s, lift_s, sing_build_s = 0.1, 0.13, 0.15
    contact = np.array([during(start, end, bite_s, lift_s) for start, end, *_ in PASSES])
    catch_db = 2 * np.tanh(2 * wobble(30))  # the drum catches and slips on the grain
    contact *= amp(ride(PRESSURE_RIDE) + catch_db)
    rasp_gain, grind_gain, sing_gain = amp(np.array(PASSES)[:, 2:]).T @ contact
    build = sum(during(start + sing_build_s, end, sing_build_s, lift_s) ** .5
                for start, end, *_ in PASSES)
    comb = amp(-1) * grit_comb(angle, speed)
    touch = unit(amp(1.8 * np.cos(angle) + 0.87 * wobble(910)))  # the drum runs slightly out of true
    dust = amp(-1.3) * (noise(RASP_SPECTRUM) + amp(ride(FIZZ_RIDE)) * noise(FIZZ_SPECTRUM))
    rasp = rasp_gain * (comb + dust * touch) * amp(1.3 * wobble(40))
    song = singing_block(angle, speed, sing_gain * build)
    grind = grind_gain * noise(GRIND_SPECTRUM) * touch
    return filtered(song + rasp + grind, lambda hz: pan(along(TOOL_PAN, hz)))


def scene():
    """Handling, then the tool at work, over the room's low rumble."""
    inertia_s = .05  # the rotor's mass rounds off each change of speed
    speed = uniform_filter1d(ride(SHAFT_SPEED), round(inertia_s * SR)) * (1 + 0.00084 * wobble(25))
    angle = 2 * np.pi * np.cumsum(speed) / SR
    handling = filtered(slides() + knocks() + cord(), lambda hz: pan(along(HAND_PAN, hz)))
    return room_tone() + handling + scuffs() + motor(angle, speed) + draught() + sanding(angle, speed)


def record(dry):
    """A brick-wall low-pass takes off the very top."""
    return filtered(dry, lambda hz: hz < 15850)


dry = scene()
out = record(dry)
unload_audio(out)
```